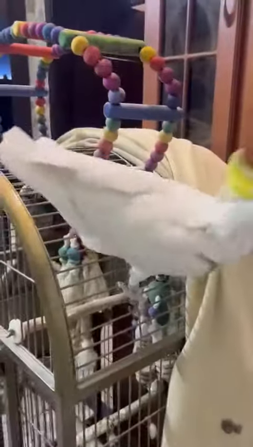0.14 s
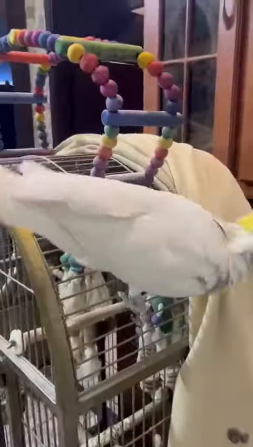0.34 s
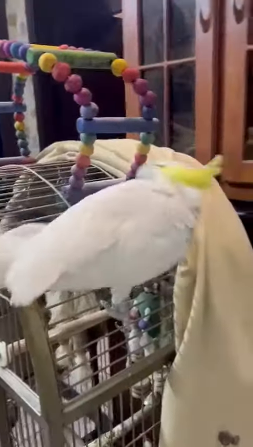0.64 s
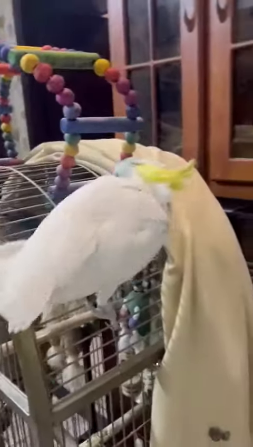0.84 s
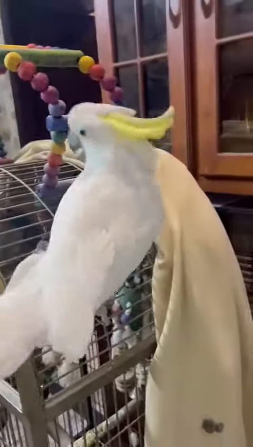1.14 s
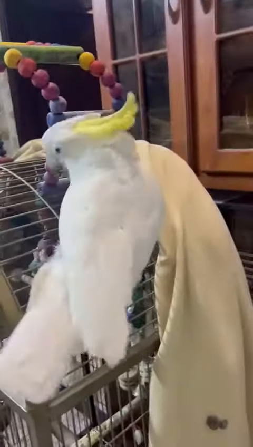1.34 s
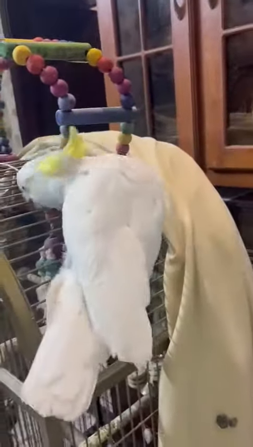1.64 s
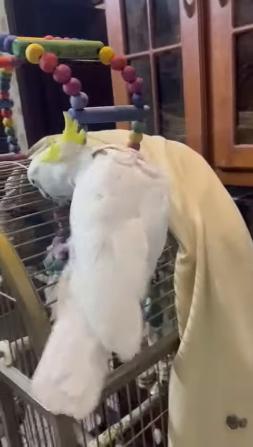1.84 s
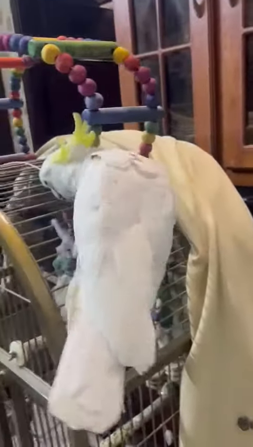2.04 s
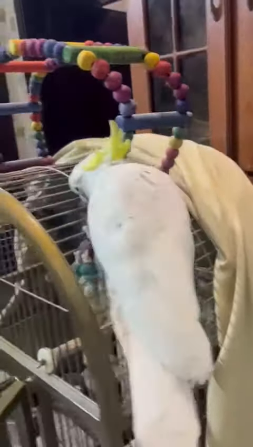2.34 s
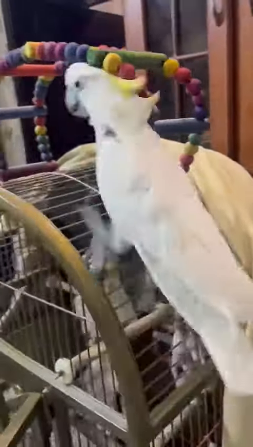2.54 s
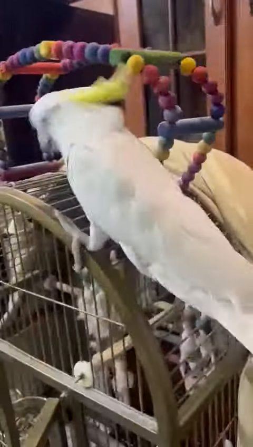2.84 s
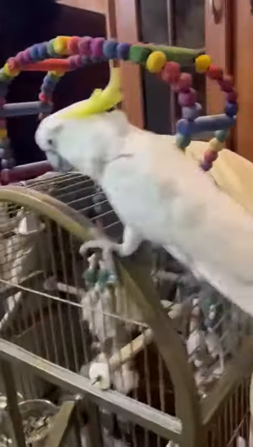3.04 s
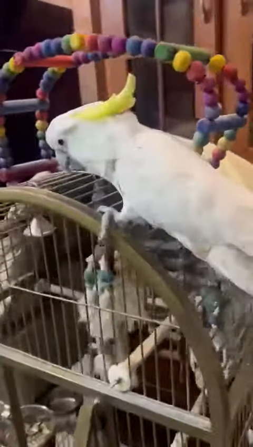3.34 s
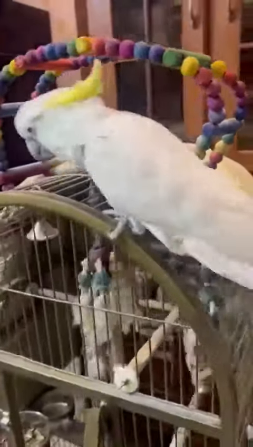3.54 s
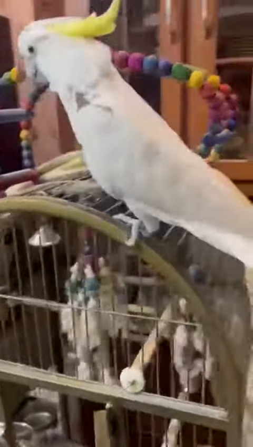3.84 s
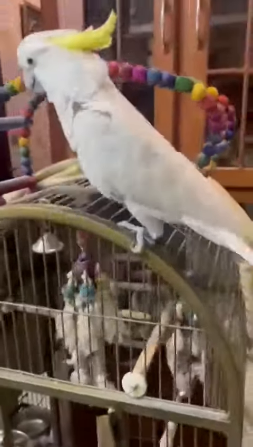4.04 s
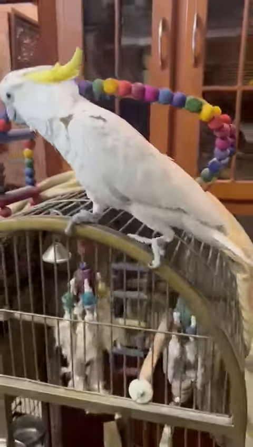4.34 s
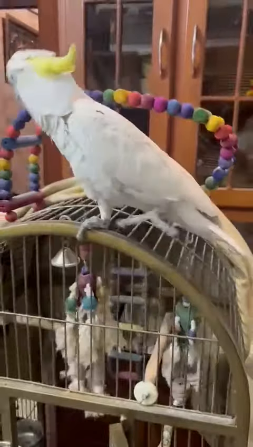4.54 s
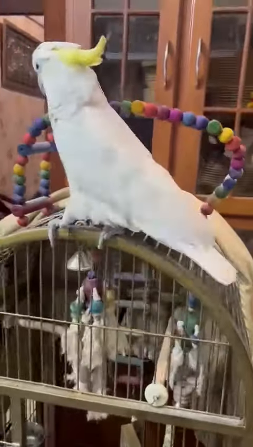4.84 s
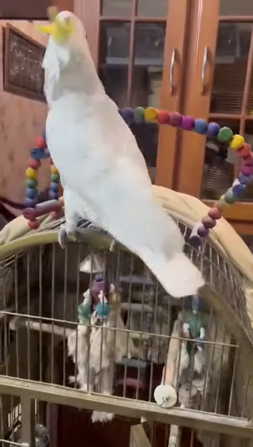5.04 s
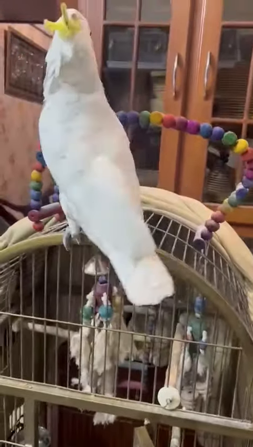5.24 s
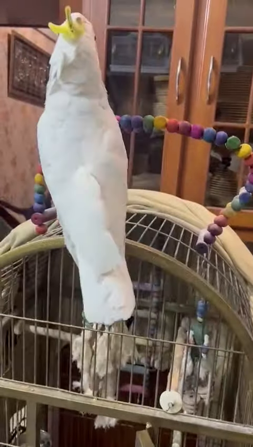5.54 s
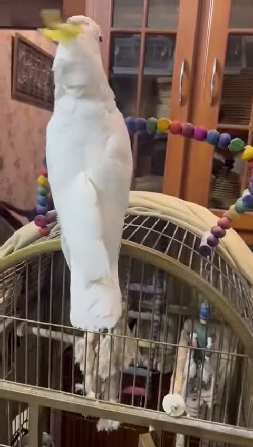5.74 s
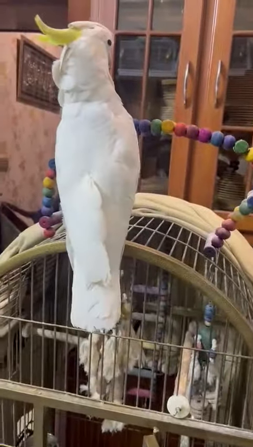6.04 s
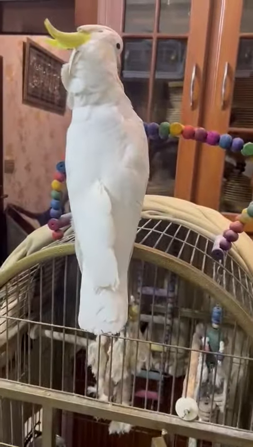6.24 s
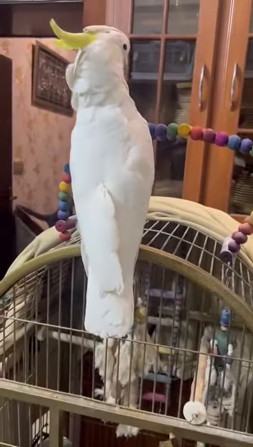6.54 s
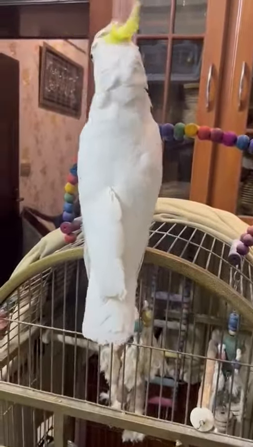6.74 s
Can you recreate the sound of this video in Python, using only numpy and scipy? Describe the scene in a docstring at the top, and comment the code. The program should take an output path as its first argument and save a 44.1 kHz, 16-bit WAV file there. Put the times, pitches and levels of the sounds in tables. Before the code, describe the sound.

A cockatoo clambers over its wire cage in a living room. Its feet rattle on the bars, it whistles two rising chirps, and a hard knock is followed by a nasal call. Claws scrape lightly along the wires and feathers rustle. Then come four short harsh squawks, the loudest sounds, and after a lull one more nasal call. It is heard from nearby, with brief room reverberation over a faint low rumble.

```python
"""A cockatoo clambers over its wire cage in a living room. Its feathers rustle and its feet knock on the
bars; then the membrane of its syrinx whistles two rising chirps and, after a hard knock, a nasal call.
Its claws scrape along the wires and the bars ring. Four squawks follow, made harsh by flutter and period
doubling. A faint drone sets in, and a second nasal call ends the scene. Throughout, the room
reverberates briefly over a low rumble."""
import sys
import numpy as np
from scipy import signal
from scipy.fft import rfft, irfft
from scipy.io import wavfile
from scipy.ndimage import uniform_filter1d, map_coordinates

SR = 44100
rng = np.random.default_rng(int(sys.argv[2]) if len(sys.argv) > 2 else 0)


def dump_mix(stems):
    """Bounce the given channels to the path in sys.argv[1] as a 16-bit WAV at rate SR."""
    frames = np.atleast_2d(stems).T  # one column per channel
    limited = np.clip(frames, -1, 1)  # hard clip at full scale
    pcm = np.round(limited * 32767).astype(np.int16)
    wavfile.write(sys.argv[1], SR, pcm)


N = 303849
TIME = np.arange(N) / SR

# Rising chirps: start_s, length_s, first_hz, top_hz, bend_exponent, level_db
CHIRPS = [(0.389, .092, 1877, 2310, 2.5, -30), (0.623, 0.11, 1684, 2362, 1.2, -23.5)]
# Nasal calls: start_s, length_s, pitch_hz, sag_hz_per_s, scoop_s, swell_s,
# fundamental_db, octave_db, upper_db
NASALS = [(1.478, .215, 2091, 600, 0.037, 0.038, -26, -22, -41),
          (6.706, 0.248, 1998, 8, 0.049, .11, -34.5, -23.5, -50)]
# Squawks: start_s, length_s, pitch_hz, sag_hz_per_s, fundamental_db, octave_db, upper_db,
# flutter_decay_s, doubling_onset_s, doubling_loss_db, lead_in_s, creak_db
SQUAWKS = [(3.824, 0.2, 2224, 330.3, -19, -14.5, -19.5, 0.041, 0.065, 3, 0.044, -11.5),
           (4.162, 0.19, 2205, 463, -23.5, -13.5, -21, 0.05, 0.0067, 5, .025, -16),
           (4.536, .166, 2154, 397.5, -23.5, -16.5, -21, .08, 0.021, 1.5, .025, -15.5),
           (4.995, 0.18, 2103, 207.4, -26.5, -19.5, -23.5, 0.0508, 0.019, 7, .0375, -21)]
# Partials of chirps and nasal calls (soft) and of squawks (harsh): pitch_multiple, level_db
SOFT_PARTIALS = [(1, -5.5), (1.5, 2), (2, -6.5), (2.5, -4), (3, 6.5), (3.5, -20.5), (4, 2), (5, -20.5)]
HARSH_PARTIALS = [(.5, -30), (1, -4), (1.5, -5.5), (2, 2.5), (2.5, -8), (3, 3), (3.5, -4), (4, -3.5),
                  (4.5, -5.5), (5, -12), (5.5, -21.5)]
# Spectrum of the voice's hiss and creaks: frequency_hz, level_db
BREATH_SPECTRUM = [(700, -25.5), (1500, -9), (2600, -4), (4200, 1.5), (7500, 0.5), (10000, -11),
                   (12000, -20)]
def cockatoo(hiss_db=-34, soft_hiss_db=-7, creak_db=-1.5):
    """Airflow drives the syrinx: periodic vibration gives the tone, turbulence the hiss."""
    gestures = [chirp(*row) for row in CHIRPS] + [nasal(*row) for row in NASALS]
    soft, soft_hiss = sum(syrinx(g, SOFT_PARTIALS, quickening_per_s=.3) for g in gestures)
    harsh, harsh_hiss = sum(syrinx(squawk(*row[:-2]), HARSH_PARTIALS, quickening_per_s=2.2, flutter_hz=98)
                            for row in SQUAWKS)
    hiss = from_db(hiss_db) * (harsh_hiss + from_db(soft_hiss_db) * soft_hiss)
    lead_in = sum(creaks(start, lead_s, db) for start, *_, lead_s, db in SQUAWKS)
    return soft + harsh + noise(BREATH_SPECTRUM) * (hiss + from_db(creak_db) * lead_in)


def syrinx(gesture, partials, quickening_per_s, flutter_hz=95, dip=.08, throb=.35, shimmer_db=2.0):
    """Flutter modulates a membrane's amplitude and frequency. Returns the tone and its hiss envelope."""
    start, end = gesture[0][0], gesture[-1][0]
    span = (TIME >= start) & (TIME < end + .04)
    t = TIME[span]
    pitch, flutter, doubling, *levels_db = in_time(gesture, t)
    flutter = np.clip(flutter, 0, 1)
    beats = np.cumsum(flutter_hz * (1 + quickening_per_s * (t - start) + .16 * drift(90, t))) / SR
    slack = ((1 + np.cos(2 * np.pi * beats)) / 2) ** 2 * (1 + .35 * drift(110, t))
    jitter = .0015 * drift(200, t) + .005 * flutter * drift(450, t)
    phase = 2 * np.pi * np.cumsum(pitch * (1 - dip * flutter * slack + jitter)) / SR
    envelope = gate(t, start, end, .003, .004) * (1 + throb * flutter * np.sin(2 * np.pi * beats))
    tone = 0
    for multiple, partial_db in partials:
        # blend of the fundamental, octave and upper levels
        shares = np.array([np.interp(multiple, [1, 2, 3], row) for row in np.eye(3)])
        gain = from_db(shares @ np.array(levels_db) + partial_db + shimmer_db * drift(150, t))
        gain *= from_db(.55 * multiple * drift(22, t))   # the beak moves: high partials swell and sink
        if multiple % 1:   # half partials: the doubled period holds only while the membrane is taut
            gain *= doubling * (1 - flutter * slack)
        tone = tone + gain * np.sin(multiple * phase)
    tone = np.sqrt(2) * tone * envelope
    effort = np.sqrt(uniform_filter1d(tone ** 2, size=128) + 1e-12)
    out = np.zeros((2, N))
    out[:, span] = tone, effort * (.5 + flutter)
    return out


def squawk(start, length, pitch_hz, sag, low_db, octave_db, upper_db, flutter_s, doubles_s, loss_db):
    """Period doubling: as the opening flutter calms, half partials draw energy from the whole ones."""
    t = np.linspace(0, length)
    flutter = .1 + np.exp(-t / flutter_s)
    drawn_db = loss_db * np.sin(np.pi * ramp(t, doubles_s, length - doubles_s))
    effort_db = -7 * (1 - ramp(t, 0, .025)) - drawn_db
    doubling = .85 * ramp(t, doubles_s, .035) * from_db(drawn_db) + .035
    levels_db = np.array([low_db, octave_db, upper_db])[:, None] + effort_db
    levels_db -= np.outer([0, 45, 4], t)   # the overtones fade, in dB per second
    return slacken(start, t, pitch_hz - sag * t, flutter, doubling, *levels_db)


def creaks(start, lead_s, db, gap_s=.0125, creak_s=.0036, swell_db=6.5):
    """Pulsed phonation: the envelope of the slow first beats of the syrinx, growing into a squawk."""
    beats = max(round(lead_s / gap_s), 1)
    times = start - gap_s * np.arange(beats + 1) + rng.normal(0, creak_s / 6, beats + 1)
    return sum(from_db(db - swell_db * (k / beats) ** 3) * gate(TIME, s, s + creak_s, creak_s, creak_s)
               for k, s in enumerate(times))


def chirp(start, length, first_hz, top_hz, bend, db, octave_db=-58, upper_db=-80.5):
    """Frequency glide: a nearly pure whistle rises and cracks into period doubling at the top."""
    t = np.linspace(0, length)
    rise = ramp(t, 0, length - SLACKEN_S)
    pitch = first_hz + (top_hz - first_hz) * rise ** bend
    flutter = .08 + .58 * rise
    doubling = .62 * ramp(t, length - SLACKEN_S, .005)
    opening_db = 17.5 * np.sin(2.9 * rise)   # the overtones gain as the beak opens
    return slacken(start, t, pitch, flutter, doubling, db, octave_db + opening_db, upper_db + opening_db)


def nasal(start, length, pitch_hz, sag, scoop_s, swell_s, low_db, octave_db, upper_db, hoarse_s=.087):
    """Roughness by modulation: a tone with a strong octave scoops up, flutters and ends hoarse."""
    t = np.linspace(0, length)
    flat = 1 - ramp(t, 0, scoop_s) ** 1.5
    pitch = (pitch_hz - sag * t) * (1 - .12 * flat)
    soft_db = 19.5 * (1 - ramp(t, 0, swell_s) ** 2)
    hoarse = flat + ramp(t, length - hoarse_s, hoarse_s)
    flutter, doubling = .351 + .328 * hoarse, .091 * hoarse
    return slacken(start, t, pitch, flutter, doubling,
                   low_db - .56 * soft_db, octave_db - soft_db, upper_db - .55 * soft_db)


SLACKEN_S = .022
def slacken(start, t, pitch, flutter, doubling, *levels_db):
    """Loss of tension ends each call flat, rough and soft. Returns the gesture that steers the syrinx."""
    slack = ramp(t, t[-1] - SLACKEN_S, SLACKEN_S)
    return np.transpose([start + t, pitch * (1 - .021 * slack), flutter + .68 * slack, doubling,
                         *(db - 7.5 * slack for db in levels_db)])


# Claws sliding along the wires: start_s, hiss_db, body_db, decay_s, centre_hz
SCRAPES = [(1.778, -39.5, -50.5, 0.031, 7860), (1.889, -37, -48.5, 0.014, 8300),
           (1.998, -44.5, -54.5, 0.029, 7760), (2.132, -27.5, -42, 0.035, 7970),
           (2.154, -31, -47.5, 0.022, 7140), (2.269, -28.5, -30.5, 0.0063, 7900),
           (2.521, -40, -48.5, 0.031, 9840), (2.574, -40.5, -40.5, 0.011, 6700),
           (2.671, -28.5, -49, 0.013, 8600), (2.958, -54.5, -86, 0.012, 8500),
           (3.137, -49.5, -54.5, 0.055, 8200), (3.201, -42.5, -50.5, 0.019, 8850),
           (3.215, -60.5, -50, 0.043, 7450), (3.413, -46, -61.5, 0.015, 9100),
           (3.458, -52.5, -58.5, 0.049, 8200), (3.565, -40, -45, 0.014, 8060)]
# Resonances of the wires: frequency_hz, bandwidth_hz, level_db
WIRE_MODES = [(4300, 200, 0.5), (6333, 180, -8.5), (6820, 50, -2), (7950, 220, -4), (9920, 980, -6.5)]
# Spectrum of the cage's body: frequency_hz, level_db
BODY_SPECTRUM = [(400, -15.5), (1200, -5), (2400, 3.5), (3300, 0), (4500, 4.5), (6500, -4), (10000, -16)]
def claws(width_hz=3000, top_hz=10600, grain_db=3.5, rise_s=.0051, ringing_db=2):
    """Sliding friction excites the wires and the cage's body; the gritty hiss fades as the claw slows."""
    out, body = np.zeros(N), noise(BODY_SPECTRUM)
    hardest_db = max(row[1] for row in SCRAPES)
    for start, hiss_db, body_db, decay_s, hz in SCRAPES:
        span = slice(int(start * SR), int(start * SR) + SR // 5)
        t = TIME[span]
        band = signal.butter(2, [hz - width_hz / 2, hz + width_hz / 2], "band", fs=SR, output="sos")
        friction = signal.sosfilt(band, rng.standard_normal(len(t)))
        wires = sum(from_db(db) * signal.lfilter(*signal.iirpeak(f, f / width, fs=SR), friction)
                    for f, width, db in WIRE_MODES)
        hiss = unit_rms(.5 * friction + from_db(ringing_db) * wires)
        rise = rise_s * from_db(.18 * (hardest_db - hiss_db))   # light contacts bite more slowly
        stroke = gate(t, start, start + rise, rise, decay_s) * from_db(grain_db * drift(550, t))
        out[span] += stroke * (from_db(hiss_db) * hiss + from_db(body_db) * body[span])
    return signal.sosfilt(signal.butter(8, top_hz, fs=SR, output="sos"), out)


# Feet and beak striking the cage: start_s, level_db
KNOCKS = [(0.25, -34.5), (0.262, -32), (0.27, -28), (0.283, -31.5), (0.299, -29), (0.305, -31),
          (1.0771, -22.5), (2.581, -53), (2.59, -58), (5.811, -46)]
# Spectrum of the frame's rattle: frequency_hz, level_db
RATTLE_SPECTRUM = [(300, -21), (600, -9), (900, 9), (1450, -7.5), (1700, 2.5), (2700, -8), (3600, -18.5),
                   (6000, -16), (8500, -27), (11000, -54)]
def knocks(decay_s=.0032, click_db=9, rattle_db=-8):
    """Heavily damped impacts: one sharp impulse on the frame, then a very short rattle."""
    taps = np.zeros(N)
    taps[[round(s * SR) for s, db in KNOCKS]] = from_db([db for s, db in KNOCKS])
    click = signal.sosfilt(signal.butter(1, [500, 3200], "band", fs=SR, output="sos"), taps + 1e-18)
    rattle = sum(from_db(db) * gate(TIME, s, s + .00088, .0003, decay_s) for s, db in KNOCKS)
    return from_db(click_db) * click + from_db(rattle_db) * rattle * noise(RATTLE_SPECTRUM)


# Modes of the bars and frame: start_s, frequency_hz, level_db, t60_s
BAR_MODES = [(3, 122, -46, 0.04), (3.128, 2370, -52.5, .2), (3.224, 2340, -45, .12),
             (3.598, 3880, -36, .07), (4.35, 262, -46.5, .25), (5.479, 265.2, -55, 0.16),
             (5.8, 1692, -69.5, 1.4), (5.9, 4485, -68.5, 0.94), (5.9, 8840, -72.5, 0.73)]
def ringing_bars():
    """Free vibration: single modes of the cage swell, then decay exponentially."""
    out = np.zeros(N)
    for start, hz, db, t60 in BAR_MODES:
        envelope = gate(TIME, start, start + .018, .0047, t60 / np.log(1000))
        out += from_db(db) * envelope * np.sin(2 * np.pi * hz * (TIME - start))
    return out


# Feathers brushing the cage: start_s, swell_s, decay_s, level_db
RUSTLES = [(-.02, 0.017, .04, -63), (.18, 0.036, 0.28, -61), (1.15, 0.11, 0.075, -57.5),
           (3.58, 0.053, .12, -48), (5.72, 0.018, 0.086, -69), (6.16, .015, .03, -70)]
# Spectrum of the rustle: frequency_hz, level_db
RUSTLE_SPECTRUM = [(1200, -20.5), (2000, -2), (2900, 0.5), (3700, 2.5), (4500, -3.5), (6200, -9),
                   (8200, -21.5), (10000, -36.5)]
def feathers():
    """Light friction against the wires makes broadband noise that swells and fades with each brush."""
    envelope = sum(from_db(db) * gate(TIME, s, s + swell, swell, decay)
                   for s, swell, decay, db in RUSTLES)
    return noise(RUSTLE_SPECTRUM) * envelope


# Reverberation time of the room: frequency_hz, t60_s
ROOM_T60 = [(300, .5), (1000, 0.4), (2200, 0.5), (4300, 0.45), (7000, .42), (11000, 0.22)]
def room(x, wet_db, side_db=-5.0, early_boost=.29, early_s=.02, left_lag_s=.000024):
    """Reverberation: dense reflections follow the direct sound and decay band by band; the left lags."""
    t = TIME[:SR]
    hz = np.arange(SR // 2 + 1.)
    mid, side = rng.standard_normal((2, SR))
    white = rfft(mid + from_db(side_db) * side * [[1], [-1]])
    centres, t60s = np.transpose(ROOM_T60)
    tail = sum(irfft(white * np.interp(hz, centres, share), SR) * from_db(-60 * t / t60)
               for share, t60 in zip(np.eye(len(t60s)), t60s))
    tail *= ramp(t, .002, .0034) * (1 + early_boost * np.exp(-t / early_s))
    tail /= np.sqrt(np.sum(tail ** 2) / 2)
    left, right = x + from_db(wet_db) * signal.fftconvolve(x[None], tail, axes=1)[:, :N]
    return np.array([map_coordinates(left, [np.arange(N) - left_lag_s * SR], order=3), right])


# Course of the ambient noise: time_s, rumble_db, air_db
AMBIENT_LEVELS = [(0.0, -51.5, -63.5), (0.46, -53, -61.5), (1.28, -53, -66), (2.13, -50, -56.5),
                  (3.05, -48, -58.5), (5.47, -60, -71), (6.89, -55, -68)]
# Spectra of the early and late rumble, the drone and the air: frequency_hz, level_db
RUMBLE_EARLY = [(13, -40), (22, -13.5), (97, 2.5), (123, 0), (167, -10), (210, -4), (252, -14), (285, -7.5),
                (400, -14.5), (520, -51), (880, -120)]
RUMBLE_LATE = [(22, -21), (43, -18), (65, -3.5), (100, -0.5), (150, 3.5), (190, -7.5), (260, -8.5),
               (330, -8.5), (400, -15)]
DRONE_SPECTRUM = [(135, -24), (158, 3), (182, -32)]
AIR_SPECTRUM = [(200, -23), (330, 1), (500, 3.5), (1000, -4.5), (2000, -8), (4000, -14), (8000, -16),
                (10500, -24.5), (12000, -43.5)]
def background(crossfade_at_s=3.9, drone_start_s=5.68, drone_db=-59):
    """Ambient noise: a low rumble that thins out, a late narrow-band drone and faint broadband air."""
    rumble_db, air_db = in_time(AMBIENT_LEVELS)
    late = ramp(TIME, crossfade_at_s - .25, .5)
    rumble = np.sqrt(1 - late) * stereo_noise(RUMBLE_EARLY, side_db=-29.5)
    rumble += np.sqrt(late) * stereo_noise(RUMBLE_LATE, side_db=-24.5)
    droning = ramp(TIME, drone_start_s, .1)
    drone = from_db(drone_db) * droning * noise(DRONE_SPECTRUM)
    air = from_db(air_db + 3.5) * stereo_noise(AIR_SPECTRUM, side_db=-2.5)
    return from_db(rumble_db - 1.09 * droning) * rumble + drone + air


def noise(spectrum):
    """Spectral shaping: white noise follows a curve in log frequency and falls steeply past its ends."""
    hz = np.arange(N // 2 + 1) * SR / N + 1e-3
    knots_hz, knots_db = np.transpose(spectrum)
    gain = from_db(np.interp(np.log(np.maximum(hz, 1)), np.log(knots_hz), knots_db))
    skirts = 1 / (1 + (knots_hz[0] / hz) ** 4) / (1 + (hz / knots_hz[-1]) ** 8)
    return unit_rms(irfft(rfft(rng.standard_normal(N)) * gain * skirts, N))


def stereo_noise(spectrum, side_db):
    """Partial coherence: the two channels share one noise in phase and another in antiphase."""
    side = from_db(side_db)
    return (noise(spectrum) + side * noise(spectrum) * [[1], [-1]]) / np.hypot(1, side)


def drift(knots_per_s, t):
    """Smooth random fluctuation with a spread of about 1."""
    return map_coordinates(rng.standard_normal(8192), [(t - t[0]) * knots_per_s], order=2, mode="wrap")


def ramp(t, start, length):
    """Linear rise from 0 to 1."""
    return np.clip((t - start) / length, 0, 1)


def gate(t, start, end, rise_s, decay_s):
    """Linear attack from start, exponential decay after end."""
    return ramp(t, start, rise_s) * np.exp(-np.maximum(t - end, 0) / decay_s)


def in_time(rows, t=TIME):
    """Linear interpolation of a curve's columns at the times t."""
    times, *columns = np.transpose(rows)
    return [np.interp(t, times, column) for column in columns]


def from_db(db):
    """Decibels to amplitude ratio."""
    return 10 ** (np.asarray(db) / 20)


def unit_rms(x):
    """Normalisation to unit power."""
    return x / np.sqrt(np.mean(x ** 2) + 1e-20)


# Left-right balance of the voice, which shifts from call to call: time_s, left_minus_right_db
VOICE_BALANCE = [(.5, 3), (1.6, -1.5), (3.9, 1.5), (4.3, 0), (5.1, 1), (6.8, 2.5)]
def scene():
    """Superposition: bird and cage sound in the same room, over the ambient noise."""
    voice = from_db(-2.73) * room(cockatoo(), wet_db=-3.5)
    balance = from_db(in_time(VOICE_BALANCE)[0] * [[.5], [-.5]])
    cage = room(claws() + feathers(), wet_db=1.0)
    cage += room(knocks(), wet_db=-2.0)
    cage += room(ringing_bars(), wet_db=-4.5)
    return voice * balance + cage + background()


def record(dry, cutoff_hz=11900):
    """Band limiting: an elliptic low-pass filter cuts the top steeply."""
    return signal.sosfilt(signal.ellip(12, .2, 80, cutoff_hz, fs=SR, output="sos"), dry)


dry = scene()
out = record(dry)
dump_mix(out)
```